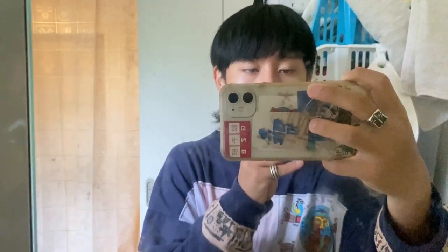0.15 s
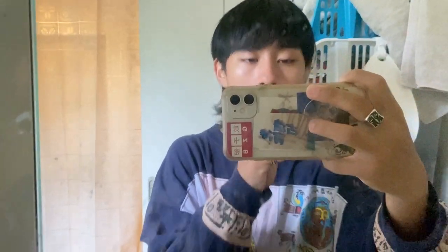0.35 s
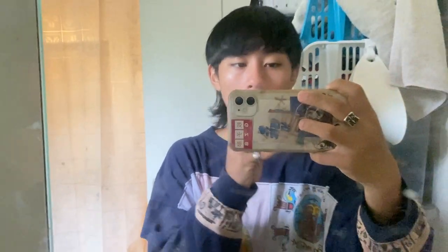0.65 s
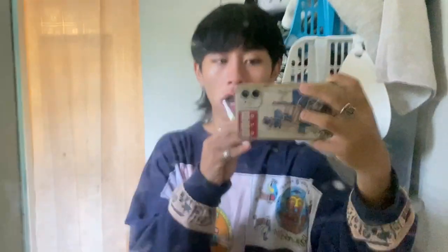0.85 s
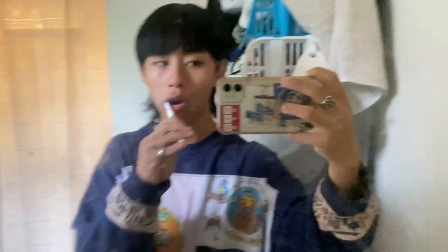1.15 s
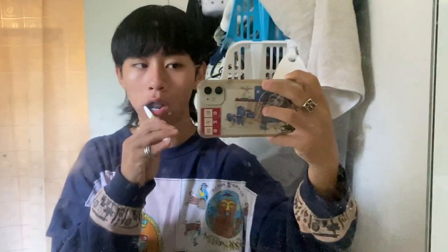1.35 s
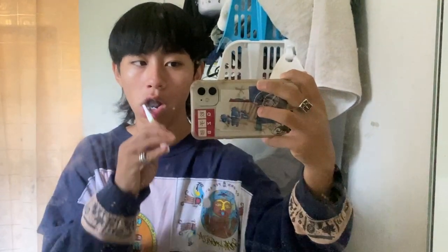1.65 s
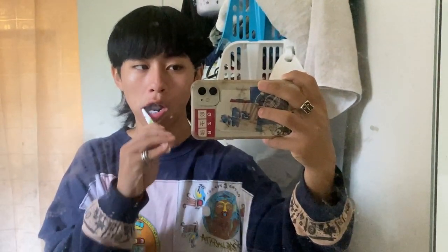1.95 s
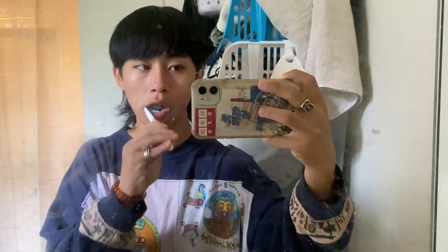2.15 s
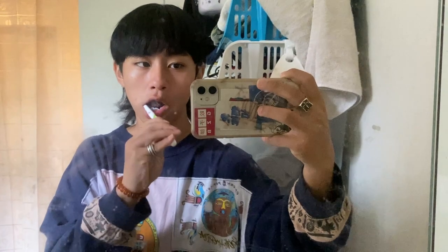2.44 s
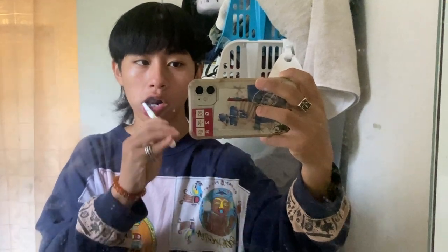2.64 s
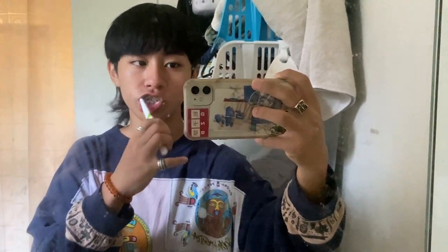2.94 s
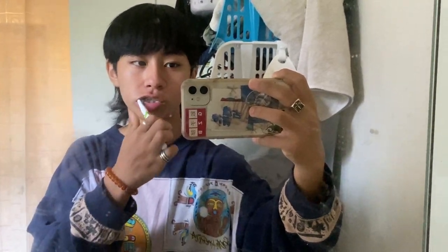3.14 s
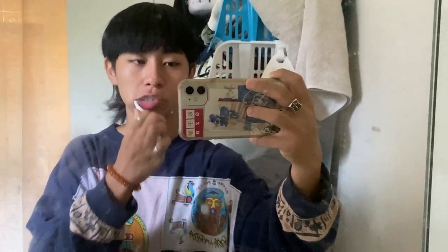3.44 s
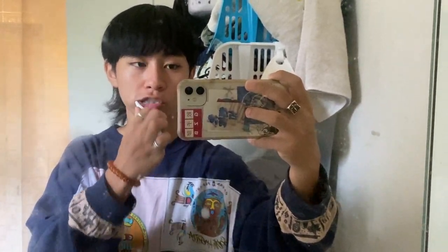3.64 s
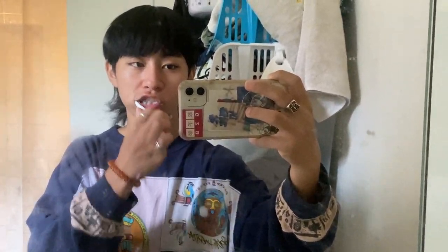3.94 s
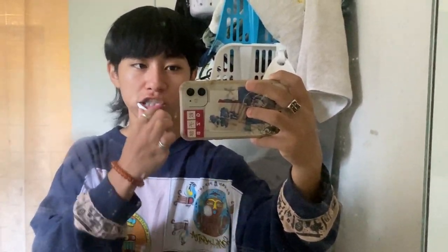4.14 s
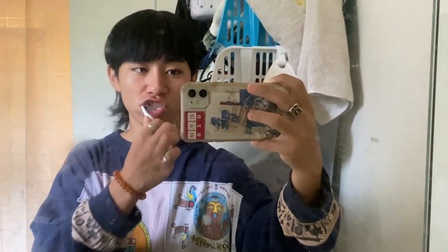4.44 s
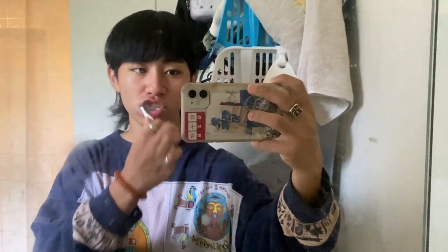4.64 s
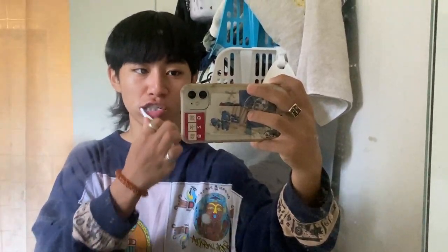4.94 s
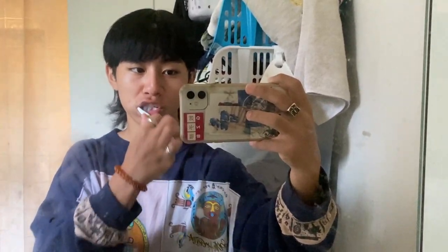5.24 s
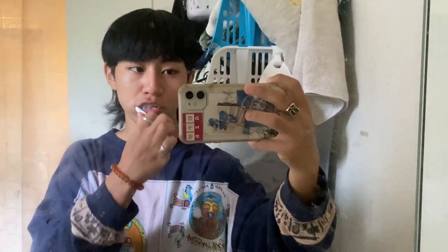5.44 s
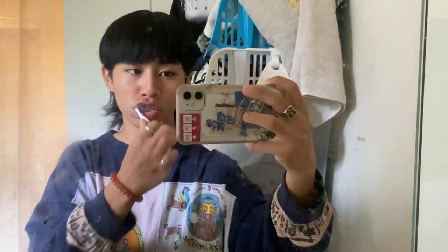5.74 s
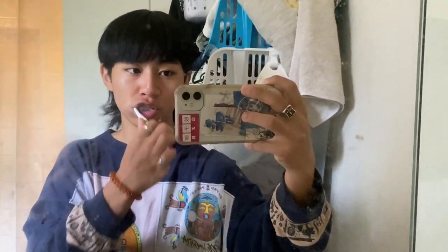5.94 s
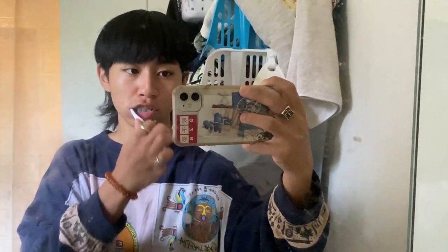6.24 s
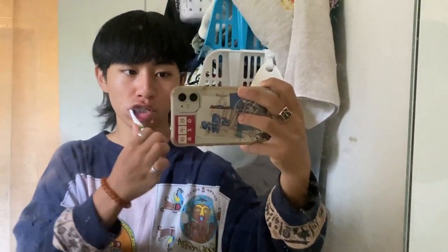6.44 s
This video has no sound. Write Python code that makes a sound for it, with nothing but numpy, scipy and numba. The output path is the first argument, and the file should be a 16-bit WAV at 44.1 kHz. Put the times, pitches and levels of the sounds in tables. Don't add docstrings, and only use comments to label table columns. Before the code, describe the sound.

Someone brushes teeth by hand in a small bathroom, quick scratchy strokes with hollow mouth ringing, pausing briefly then resuming harder over low ventilation hum.

```python
import sys
import numpy as np
from scipy import signal
from scipy.fft import rfft, irfft, next_fast_len
from scipy.io import wavfile
from scipy.ndimage import uniform_filter1d
from numba import njit

SR = 44100
rng = np.random.default_rng(int(sys.argv[2]) if len(sys.argv) > 2 else 0)


def to_wav(sig):
    pcm = np.clip(np.atleast_2d(sig), -1, 1) * 32767
    pcm = np.round(pcm).astype(np.int16)
    wavfile.write(sys.argv[1], SR, pcm.T)


N = 290486
SIZE = next_fast_len(N)

# middle_s, strength_db
FIRST_STROKES = [(0.035, -54.5), (0.125, -52), (0.273, -52), (0.375, -53), (0.511, -54), (0.646, -52.5),
                 (0.79, -60), (0.865, -58.5), (0.985, -58), (1.067, -59.5), (1.185, -56.5), (1.255, -50.5),
                 (1.373, -49.5), (1.487, -50.5), (1.579, -48.5), (1.709, -50), (1.785, -49), (1.908, -50),
                 (1.995, -50.5), (2.112, -51.5), (2.207, -51), (2.323, -51.5), (2.404, -52), (2.508, -52.5),
                 (2.59, -53), (2.699, -47), (2.785, -49.5)]
# middle_s, strength_db
LIGHT_STROKES = [
    (2.875, -61.5),
    (2.937, -65),
    (6.514, -59.5),
]
# middle_s, strength_db
OTHER_STROKES = [(3.235, -55), (3.363, -43), (3.462, -50.5), (3.585, -52.5), (3.673, -49.5), (3.802, -47.5),
                 (3.884, -48.5), (4.013, -47), (4.104, -46), (4.23, -42.5), (4.331, -45.5), (4.45, -44),
                 (4.552, -45), (4.676, -42), (4.773, -44.5), (4.892, -43.5), (4.993, -48), (5.104, -43.5),
                 (5.198, -49), (5.315, -45), (5.412, -49), (5.537, -47), (5.629, -50.5), (5.756, -45),
                 (5.858, -48.5), (5.993, -46.5), (6.089, -48.5), (6.213, -45), (6.297, -48.5),
                 (6.428, -45.5)]
ALL_STROKES = np.array(sorted(FIRST_STROKES + LIGHT_STROKES + OTHER_STROKES))
STROKE_S = ALL_STROKES[:, 0]
# start_s, peak_db, brightness_db
HEAD_BUMPS = [(0.0998, -34.5, -17), (2.177, -33, -22), (2.393, -49, -11), (2.5214, -37, -8),
              (3.056, -34.5, 5), (3.3042, -33.5, -32), (3.3617, -26, -14), (3.5557, -33.5, -14),
              (3.662, -25, -21), (3.7923, -35, -7), (3.8588, -38, -27), (3.967, -36, -20),
              (4.0834, -36, -8), (4.1987, -27.5, -67), (4.2986, -51.5, -14), (4.334, -25, -29),
              (4.4223, -25, -26), (4.5456, -22.5, -30), (4.649, -26.5, 0), (4.861, -37, -9),
              (5.0013, -34, -19), (5.185, -42, -14), (5.4102, -29, -16), (5.5167, -24.5, -18),
              (5.7035, -38, -8), (5.822, -39.5, -12.5), (5.9737, -35, -14), (6.264, -33.5, -1),
              (6.4103, -28.5, -8), (6.511, -36, 3)]
# start_s, cavity_hz, ring_over_hiss_db, handle_ring_db
MOUTH_SHAPE = [(0, 1010, 6, -27), (.6, 1125, 4.5, -23), (.9, 1050, 13, -13), (1.2, 1080, 5.5, -4),
               (1.45, 1242, 6.5, -8.5), (1.85, 1173, 4.5, -7.5), (2.6, 1204, 8, -2.5),
               (2.9, 1230, -3.5, -53), (3.06, 1425, 5, 11), (3.4, 1354, 2, 1), (3.7, 1400, 10, 4),
               (4.1, 1370, 9, -0.5), (4.8, 1286, 1, 0.5), (5.2, 1340, 5.5, -6), (5.55, 1193, 4, -4),
               (5.8, 1270, 6.5, -5), (6.2, 1290, 4, -7.5), (6.59, 1384, 9.5, -16)]


def from_db(db):
    return 10 ** (np.asarray(db) / 20)


def rms_one(x):
    return x / np.sqrt(np.mean(x ** 2) + 1e-20)


def at_hz(points, hz, column=1):
    points = np.array(points)
    return np.interp(np.log(hz + 1), np.log(points[:, 0]), points[:, column])


def in_time(points, column, s=None):
    points = np.array(points)
    s = np.arange(N) / SR if s is None else s
    return np.interp(s, points[:, 0], points[:, column])


def per_stroke(values):
    return np.interp(np.arange(N) / SR, STROKE_S, values)


def drift(rate_hz):
    r = np.exp(-2 * np.pi * rate_hz / SR)
    settle = 9000
    noise = rng.standard_normal(N + settle)
    return rms_one(signal.lfilter([1], [1, -2 * r, r * r], noise)[settle:])


def resonate(x, hz, width_hz):
    r = np.exp(-np.pi * width_hz / SR)
    poles = [1, -2 * r * np.cos(2 * np.pi * hz / SR), r * r]
    return signal.lfilter([(1 - r * r) / 2, 0, (r * r - 1) / 2], poles, x)


@njit
def glide(x, turn, r):
    y = np.zeros(len(x))
    for i in range(2, len(x)):
        y[i] = x[i] - x[i - 2] + turn[i] * y[i - 1] - r * r * y[i - 2]
    return y


def clicks(rows, db):
    x = np.full(N, 1e-18)
    x[[round(row[0] * SR) for row in rows]] = from_db(db)
    return x


def poses(times_s):
    t = np.arange(N) / SR
    shares = []
    for start_s, end_s in zip(times_s, times_s[1:]):
        held = (t >= start_s) & (t < end_s)
        shares.append(uniform_filter1d(held * 1., size=1500))
    return shares


def ventilation():
    # hz, db_per_hz, left_right_likeness
    air_colour = [(26, -34, .98), (36.3, -8.5, 0.52), (86.4, -3.5, 0.99), (139, -5.5, 0.83),
                  (199, -20.5, 0.31), (338, -22, 0.4), (390, -26.5, 0.1), (554, -26.5, 0.2),
                  (716, -23.5, 0.092), (780, -33, 0.35), (1400, -31, 0.23), (3200, -42.5, 0.077),
                  (7300, -51, 0.17), (15100, -60, 0.32)]
    # hz, width_hz, level_db
    duct_tones = [(108.56, 3.95, -55), (84, 2.85, -57.5), (210.6, 17.6, -71.5), (528.8, 34, -74),
                  (685, 15, -78.5)]
    air_db, right_db = -52.5, 3.5
    hz = np.fft.rfftfreq(SIZE, 1 / SR)
    colour = rms_one(from_db(at_hz(air_colour, hz)))
    mid, left, right = rfft(rng.standard_normal((3, N)), SIZE) * colour
    alike = np.clip(at_hz(air_colour, hz, column=2), 0, 1)
    common = irfft(mid * np.sqrt(alike), SIZE)[:N]
    own = irfft(np.sqrt(1 - alike) * np.array([left, right]), SIZE)[:, :N]
    air = from_db(air_db) * (ports(common) + own)
    balance = from_db([[-right_db / 2], [right_db / 2]])
    for tone_hz, width_hz, tone_db in duct_tones:
        tone = resonate(rng.standard_normal(N), tone_hz, width_hz)
        tone = resonate(tone, tone_hz, 3 * width_hz)
        air += from_db(tone_db) * rms_one(tone) * balance
    return air


def flicks(per_s, spread_db):
    size_db = spread_db * np.minimum(rng.exponential(1, N), 5)
    sizes = from_db(size_db) * rng.choice([-1, 1], N)
    return rms_one(sizes * (rng.random(N) < per_s / SR))


def gaps():
    mean_s, swing_s, longest_s = 0.095, 0.042, .14
    gap_s = np.minimum(np.diff(STROKE_S, prepend=-mean_s), longest_s)
    return gap_s, np.clip((mean_s - gap_s) / swing_s, -1, 1)


def speed(extra_db, stretch, rise_edge, fall_edge):
    rise_per_gap, fall_s = 0.21, 0.019
    linger_db, linger_s = -18.5, 0.054
    power = np.zeros(N)
    for (s, db), gap_s, more_db in zip(ALL_STROKES, gaps()[0], extra_db):
        i = np.arange(max(round((s - .25) * SR), 0), min(round((s + .25) * SR), N))
        away_s = (i / SR - s) / stretch
        rise = np.abs(away_s / (rise_per_gap * gap_s)) ** rise_edge
        fall = np.abs(away_s / fall_s) ** fall_edge
        swell = np.exp(-np.where(away_s < 0, rise, fall))
        linger = from_db(2 * linger_db) * np.exp(-(away_s / linger_s) ** 2)
        power[i] += from_db(2 * (db + more_db)) * (swell + linger)
    return np.sqrt(power)


def hiss(scratch):
    # start_s, peak_db
    wet_clicks = [(0.2384, -46), (0.3674, -51), (0.7044, -64), (1.152, -38), (1.7123, -18.5),
                  (2.8684, -24.5), (2.8762, -24.5), (2.9944, -41), (3.058, -42), (3.1007, -37),
                  (3.317, -52), (5.5378, -17), (5.551, -18)]
    # hz, db_per_hz
    bristle_colour = [(300, -43), (500, -2.5), (800, -7), (1600, -7.5), (3000, -5), (5500, -1),
                      (7500, -11.5), (9100, 4), (10300, -11.5), (12000, -16.5), (15500, -16)]
    # hz, width_hz, pose_1_db, pose_2_db, pose_3_db
    cheek_modes = [(2210, 210, -12, -10, -6.5), (2685, 106, 3.5, 5, 1), (3228, 93, 11, 2.5, 3),
                   (3510, 380, 11.5, -5.5, -9), (3583, 262, 7.5, -1.5, 0), (4340, 83, -12, 3.5, 1.5),
                   (4800, 70, -29, -2, -1), (6360, 520, 7.5, 2.5, 0), (7380, 366, -14, -8, 0),
                   (7800, 70, -27, -4, -7)]
    pose_times_s = [0, 1.14, 3.0, 7]
    # start_s, treble_db
    grip_turns = [
        (0, -6),
        (.5, 4),
        (2.6, 10),
        (3.06, -35),
        (3.4, 4.5),
        (4.3, 1),
        (5.1, 2.5),
        (5.7, 3),
        (6.59, 5),
    ]
    steady_db = np.zeros(len(ALL_STROKES))
    drive = scratch * from_db(2.2 * drift(56)) * speed(steady_db, stretch=1.47, rise_edge=3.95, fall_edge=1.89)
    ticks = clicks(wet_clicks, np.array(wet_clicks)[:, 1] + 1.7)
    drive += signal.lfilter([.6], [1, -.4], ticks)
    bump_db = np.sum(np.array(HEAD_BUMPS)[:, 1:], axis=1) + 7.0
    drive += signal.lfilter([.16], [1, -1.4, .56], clicks(HEAD_BUMPS, bump_db))

    colour = from_db(at_hz(bristle_colour, np.fft.rfftfreq(SIZE, 1 / SR)))
    plain = irfft(rfft(drive, SIZE) * rms_one(colour), SIZE)[:N]
    out = 0.45 * plain * from_db(1.58 * drift(42))
    pose = np.array(poses(pose_times_s))
    changed_db = 2 * rng.standard_normal((len(ALL_STROKES), len(cheek_modes)))
    for k, (hz, width_hz, *pose_db) in enumerate(cheek_modes):
        waver_db = per_stroke(changed_db[:, k]) + 2.67 * drift(16.7)
        gain = (from_db(pose_db) @ pose) * from_db(waver_db)
        out += (-1) ** k * resonate(plain, hz, width_hz) * gain
    treble = signal.sosfilt(signal.butter(1, 6000, "high", fs=SR, output="sos"), out)
    return from_db(4.0) * (out + (from_db(in_time(grip_turns, column=1)) - 1) * treble)


def cavity(x, width_hz, split):
    r = np.exp(-np.pi * width_hz / SR)
    bend = 1 + 0.0083 * per_stroke(gaps()[1]) + 0.044 * drift(6.6)
    hz = in_time(MOUTH_SHAPE, column=1) * bend
    for shift in (1 - split, 1 + split):
        x = glide(x, 2 * r * np.cos(2 * np.pi * hz * shift / SR), r)
    return signal.sosfilt(signal.butter(3, 940, "high", fs=SR, output="sos"), x)


def skid():
    n = np.arange(220)
    grit = np.exp(-n / 70) * (rng.random(220) < .04)
    nudges = (n % 33 == 0) * (n < 99)
    return .4 * grit + .3 * nudges


def mouth(scratch):
    # hz, width_hz, level_db
    handle_modes = [(1728, 90, -10.5), (1854, 65, -43), (1980, 220, -9.5), (2300, 83, -8)]
    bump_lead_s = 0.00143
    drive = (.5 * scratch + flicks(900, spread_db=0.5)) * from_db(3.7 * drift(84))
    drive_rms = np.sqrt(np.mean(cavity(drive, 194.4, 0.072) ** 2))
    ring_db = in_time(MOUTH_SHAPE, column=2, s=STROKE_S) + 0.9 * gaps()[1]
    drive = drive * speed(ring_db, stretch=1.293, rise_edge=2.3, fall_edge=2.84)

    hits = clicks(HEAD_BUMPS, np.array(HEAD_BUMPS)[:, 1] - 9.0)
    bumps = signal.fftconvolve(hits, skid())[round(bump_lead_s * SR):][:N]
    click_peak = np.max(np.abs(cavity(clicks([(3,)], 0), 367, 0.24)))
    handle = 0
    for hz, width_hz, db in handle_modes:
        mode_db = 13.5 + db + in_time(MOUTH_SHAPE, column=3)
        handle += resonate(drive + from_db(18.5) * hits, hz, width_hz) * from_db(mode_db)
    strokes = from_db(0.3) * cavity(drive, 259, 0.026) / drive_rms
    return strokes + cavity(bumps, 150, 0.097) / click_peak + handle


def thump():
    # level_db, pitch_hz, t60_s
    case_tap = (-39.5, 107, 0.012)
    start_s = .704
    db, hz, t60_s = case_tap
    t = np.maximum(np.arange(N) / SR - start_s, 0)
    cycles = hz * (t + 0.0091 * (1 - np.exp(-t / 0.0021)))
    return from_db(db - 60 * t / t60_s) * np.sin(2 * np.pi * cycles)


def echoes(x):
    # lag_s, level_db
    reflections = [(.002, -20.5), (.0025, -27.5), (.0033, -25.5), (.0068, -28.5), (.0106, -11.5),
                   (.0138, -25.5), (.0181, -31)]
    out = x.copy()
    for k, (lag_s, db) in enumerate(reflections):
        lag = round(lag_s * SR)
        out[lag:] += (-1) ** k * from_db(db) * x[:N - lag]
    return out


def ports(x):
    # hz, pose_1_left_lead_rad, pose_2_left_lead_rad, pose_3_left_lead_rad, left_minus_right_db
    port_rows = [(50, .1, .1, .1, -2.5), (300, .3, .4, .3, -1.5), (950, .5, 1.8, 1.6, 0),
                 (1550, .2, .9, .6, -6), (2000, .8, 2.6, 2.3, -7), (2600, 1.3, 4.3, 4, -3),
                 (3100, 2.3, 5.7, 5.5, -4), (3600, 2.3, 5.7, 4.6, -2), (4100, 2.1, 6.3, 5.8, -1.5),
                 (4800, 2, 7.6, 6.4, -1), (5200, 2.1, 9, 7.4, 0), (5700, 2.5, 9.8, 7.8, -.5),
                 (6550, 4.3, 11.9, 6.2, -5), (7400, 5.1, 12.3, 4, -7), (8200, 4.5, 10.8, 4.6, -1),
                 (8700, 3.7, 10, 3.7, 0)]
    turn_times_s = [0, .8, 2.63, 7]
    treble_lag_s = .000243
    dip_hz, dip_width_hz, dip_db = 8950, 650, -8
    hz = np.fft.rfftfreq(SIZE, 1 / SR)
    treble_rad = 2 * np.pi * treble_lag_s * np.maximum(hz - port_rows[-1][0], 0)
    shading = from_db(at_hz(port_rows, hz, column=4) / 2)
    out = 0
    for k, share in enumerate(poses(turn_times_s)):
        lead_rad = at_hz(port_rows, hz, column=k + 1) - treble_rad
        left = shading * np.exp(.5j * lead_rad)
        out = out + rfft(x * share, SIZE) * np.array([left, 1 / left])
    dip = from_db(dip_db * np.exp(-((hz - dip_hz) / dip_width_hz) ** 2))
    return irfft(out * dip, SIZE)[:, :N]


def bathroom(x):
    t60_bass_s, cut_hz = 0.088, 7000
    size = next_fast_len(N + SR)
    hz = np.fft.rfftfreq(size, 1 / SR)
    t60_s = t60_bass_s / (1 + (hz / cut_hz) ** 2)
    out = np.zeros((2, len(hz)), complex)
    for k, lag_s in enumerate(rng.uniform(0.005, .024, 16)):
        loop = from_db(-60 * lag_s / t60_s) * np.exp(-2j * np.pi * hz * lag_s)
        out[k % 2] += loop / (1 - loop) * (-1) ** (k // 2)
    return irfft(rfft(x, size) * out / (1 + (hz / cut_hz) ** 4), size)[:, :N]


def scene():
    scratch = flicks(7000, spread_db=1.5)
    brush = from_db(-3.0) * echoes(mouth(scratch) + hiss(scratch))
    room = from_db(-6.5) * bathroom(brush)
    return ports(brush) + room + ventilation() + thump()


def masked(x):
    # hz, db_under_stronger_of_mid_and_side
    mask_limit = [(100, -40), (2500, -26), (4500, -16), (5500, -12), (8000, -13), (9000, -7), (11000, -5),
                  (13000, -3.5), (16000, -3)]
    hz, _, both = signal.stft([x[0] + x[1], x[0] - x[1]], SR, nperseg=2048, noverlap=1024)
    power, frames = np.abs(both) ** 2, both.shape[2]
    waver_db = np.repeat(rng.normal(0, 2, (65, frames)), 16, axis=0)[:len(hz)]
    waver_db -= 25 * (rng.random(frames) < .06)
    local = uniform_filter1d(power.max(axis=0), size=80, axis=0)
    limit = local * from_db(2 * (at_hz(mask_limit, hz)[:, None] + waver_db))
    band = power[:, :-1].reshape(2, -1, 16, frames).mean(axis=2)
    band = np.repeat(band, 16, axis=1)
    both[:, :-1] *= (band > limit[:-1]) * (power > .35 * limit)[:, :-1]
    mid, side = signal.istft(both, SR, nperseg=2048, noverlap=1024)[1][:, :N]
    return np.array([mid + side, mid - side]) / 2


def band_limit(x):
    return signal.sosfilt(signal.butter(12, 15770, fs=SR, output="sos"), x)


def record(dry):
    top_cut = signal.cheby2(12, 60, 16020, fs=SR, output="sos")
    mix = signal.sosfilt(top_cut, masked(dry))
    return band_limit(mix)


dry = scene()
out = record(dry)
to_wav(out)
```